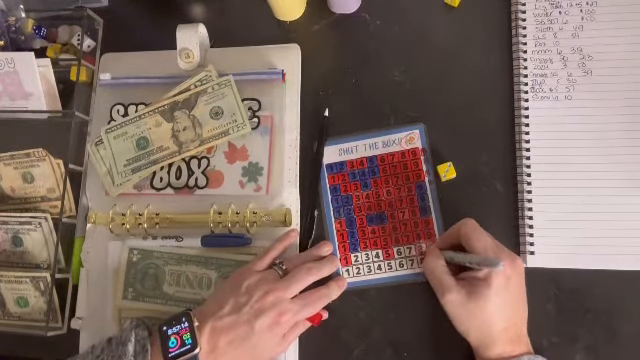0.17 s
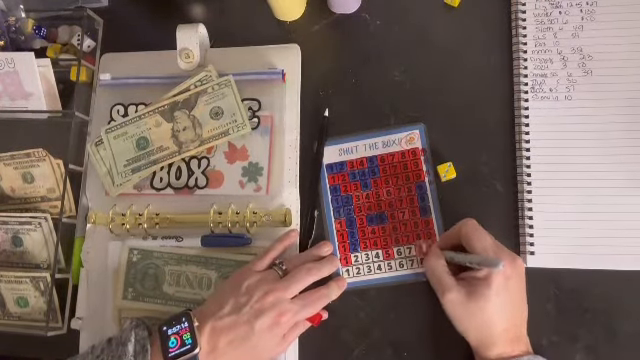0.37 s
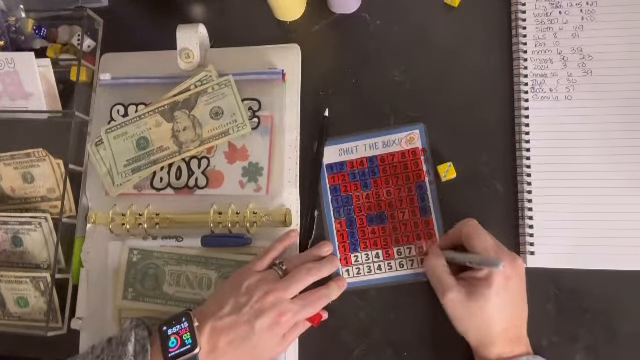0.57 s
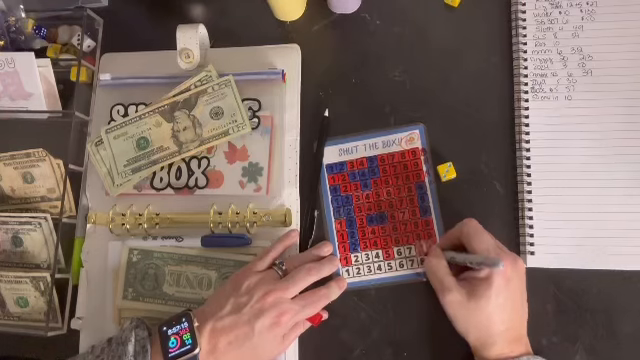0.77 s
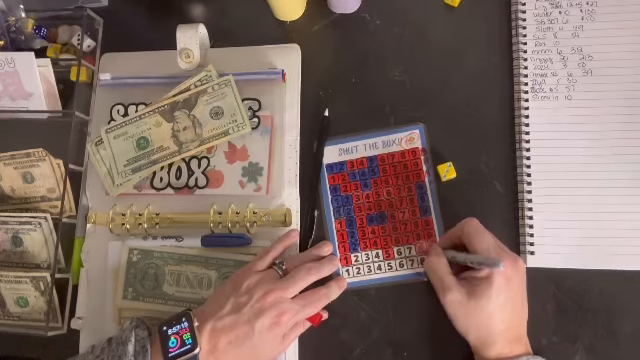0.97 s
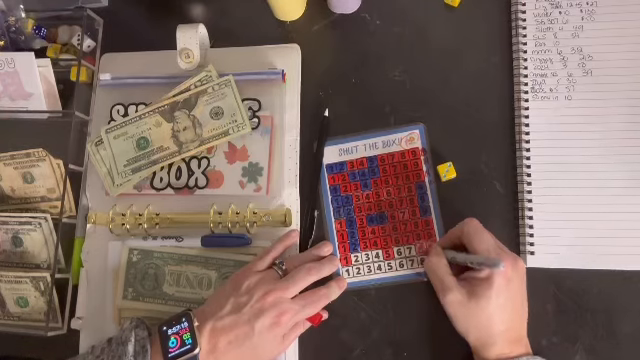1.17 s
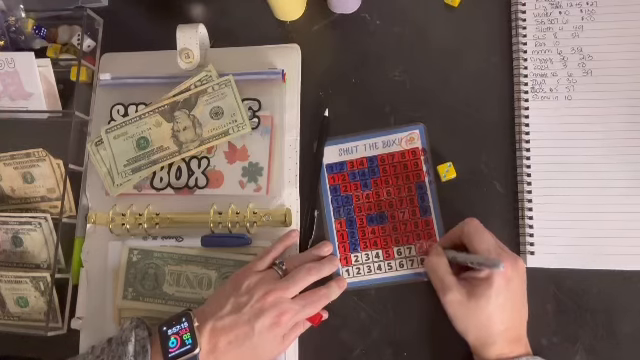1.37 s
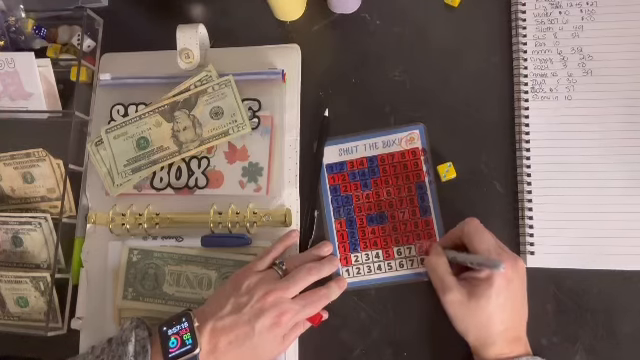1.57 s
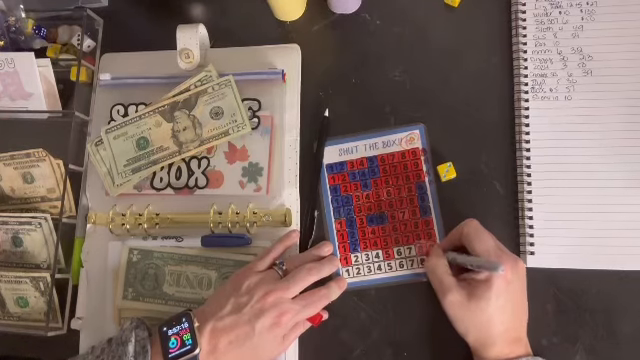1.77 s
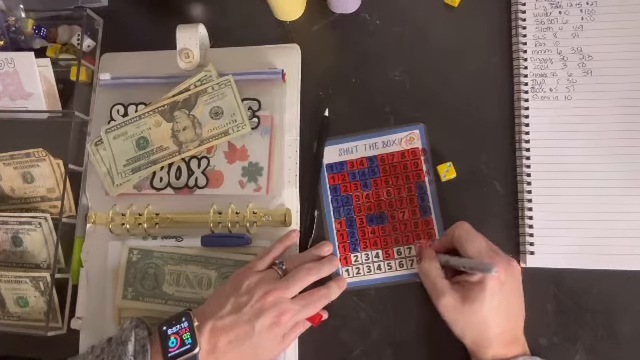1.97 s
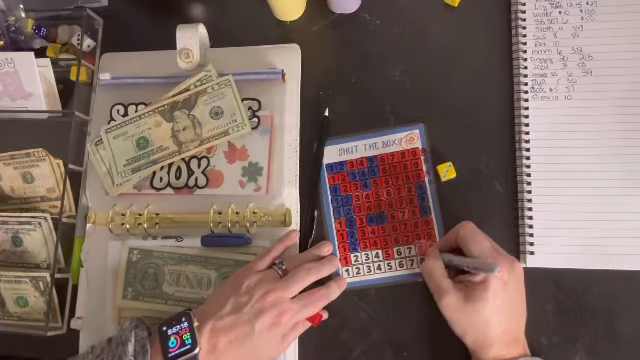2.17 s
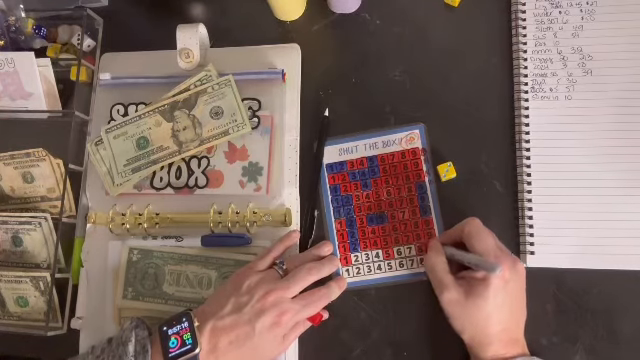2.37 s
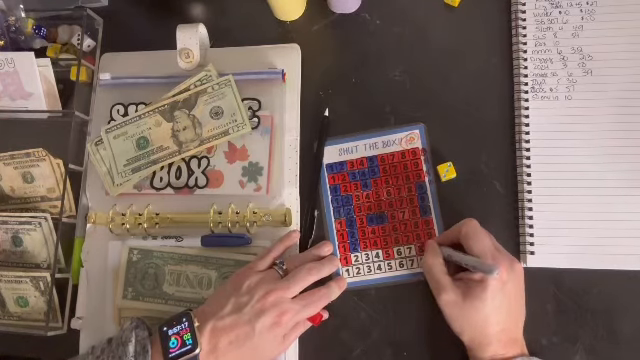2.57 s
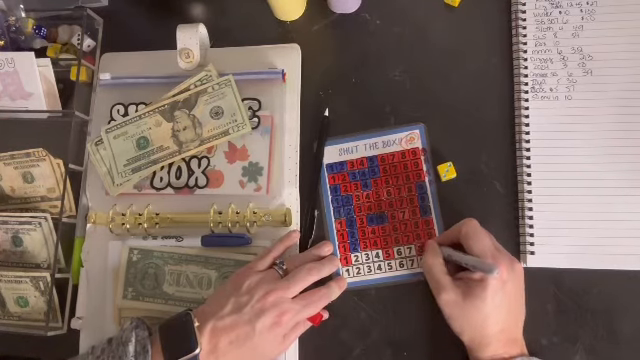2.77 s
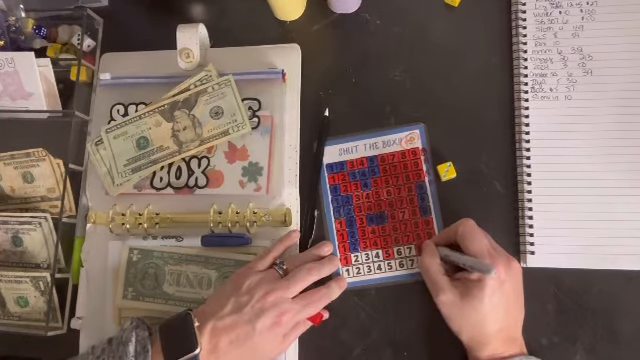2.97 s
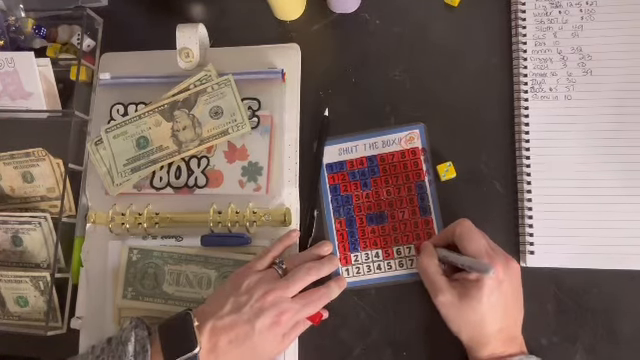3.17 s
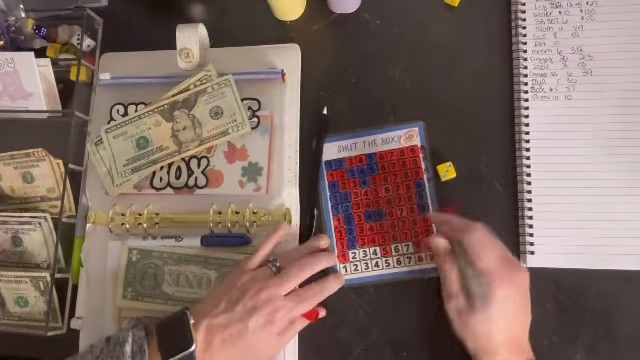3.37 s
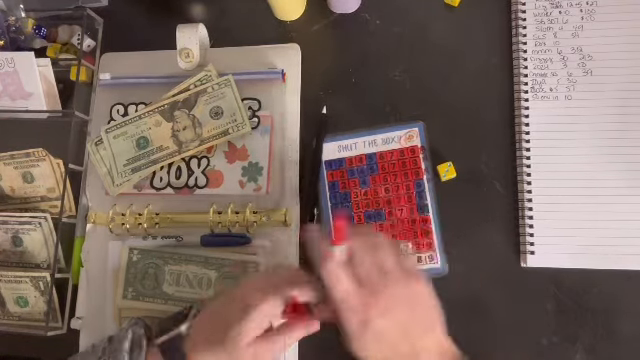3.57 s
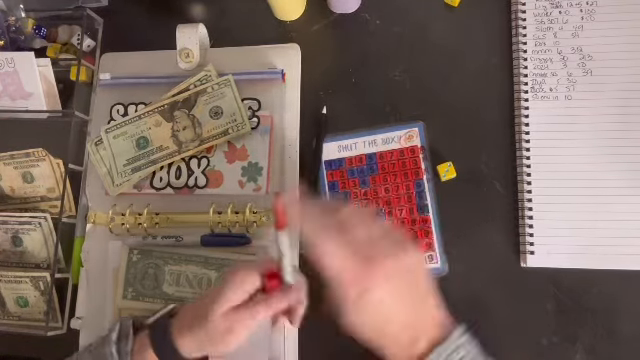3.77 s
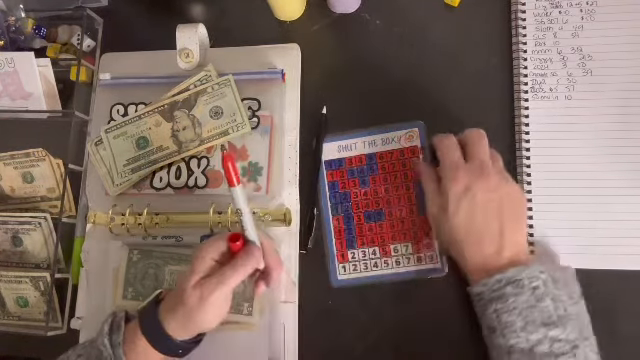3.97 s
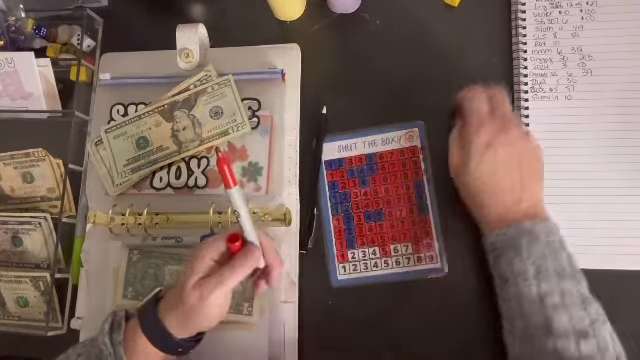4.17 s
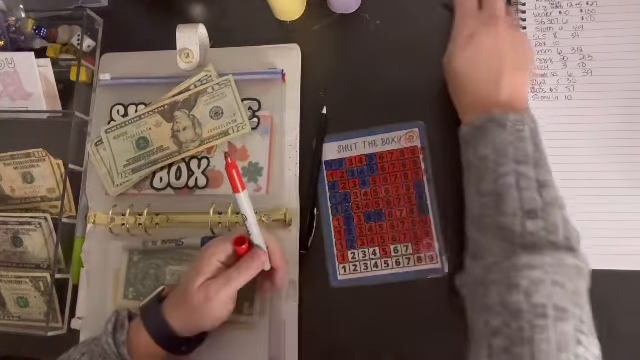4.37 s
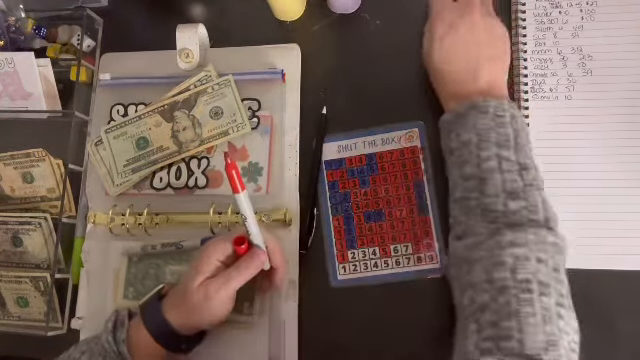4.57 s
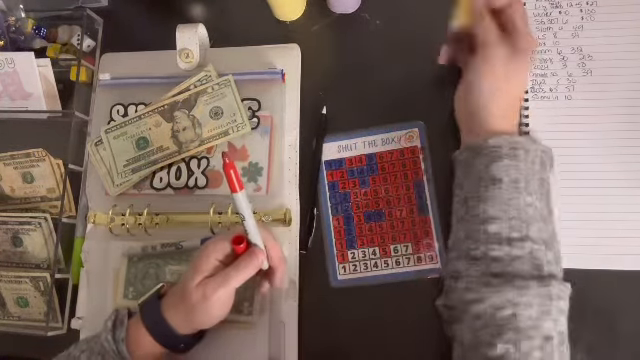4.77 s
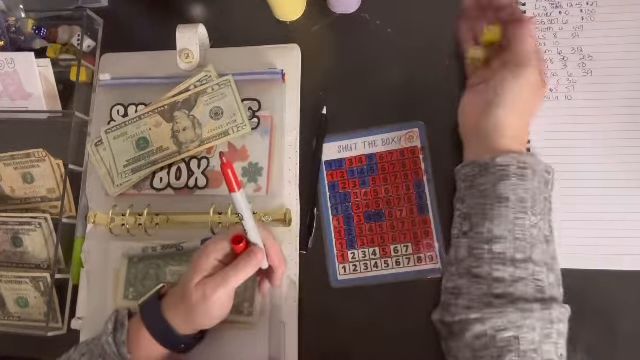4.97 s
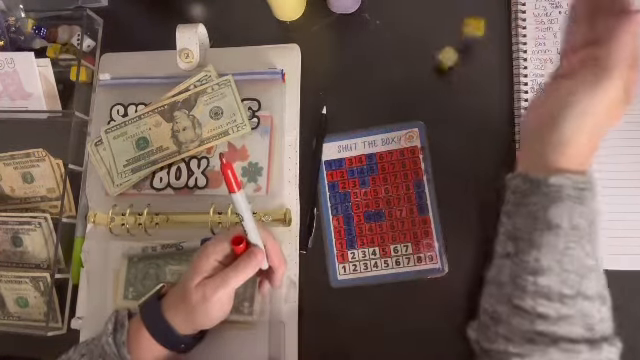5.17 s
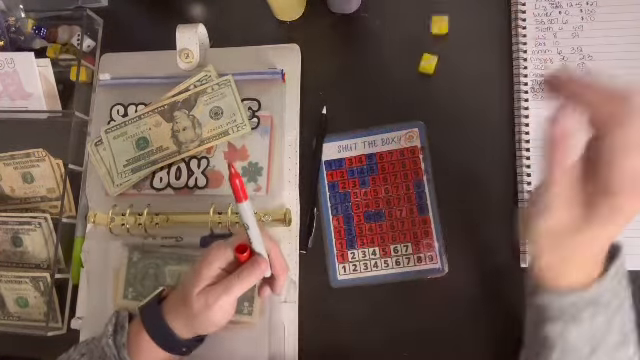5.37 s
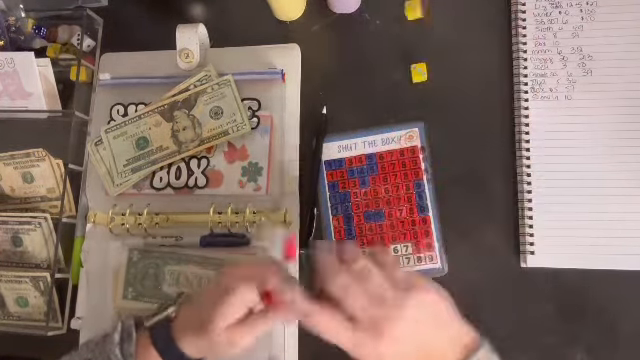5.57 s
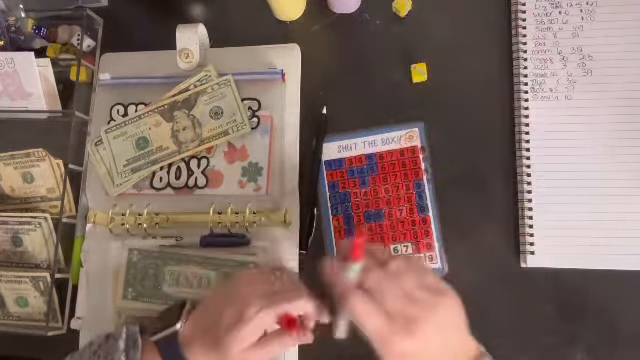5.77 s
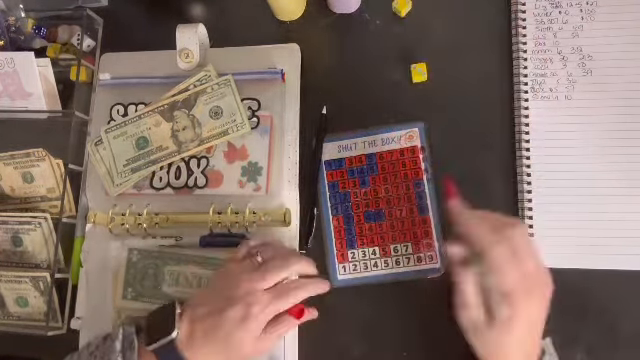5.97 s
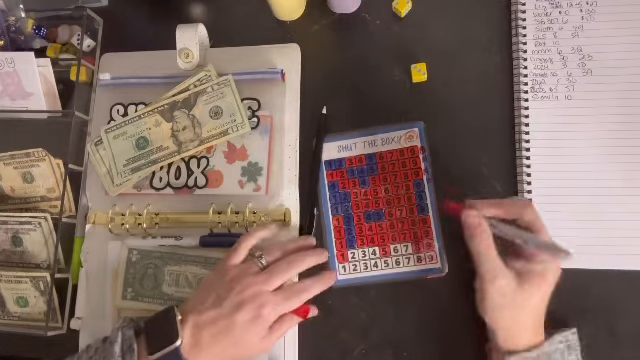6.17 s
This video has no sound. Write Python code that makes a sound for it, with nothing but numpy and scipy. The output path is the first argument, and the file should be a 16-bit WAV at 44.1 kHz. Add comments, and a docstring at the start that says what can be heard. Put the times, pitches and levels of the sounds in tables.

```python
"""A felt marker hisses back and forth on a card, colouring a square; its tip knocks now and then,
ringing card, barrel and the hard table below. A hand gathers two plastic dice, rattles and throws them:
they clack and tumble to rest, each bounce thumping the table top. A quiet small room rumbles underneath.
A phone above the table hears it through two close microphone ports."""
import sys
import numpy as np
from scipy import signal
from scipy.fft import rfft, irfft, next_fast_len
from scipy.io import wavfile
from scipy.ndimage import map_coordinates

SR = 44100
rng = np.random.default_rng(int(sys.argv[2]) if len(sys.argv) > 2 else 0)


def pcm_store(signal):
    """Save signal as 16-bit PCM."""
    levels = np.round(np.clip(np.atleast_2d(signal), -1, 1) * 32767)
    wavfile.write(sys.argv[1], SR, levels.astype(np.int16).T)


N = 273684
LEAD_S = .0016  # impacts start this early to allow for their lead-in

# Broad body of a die's clack: f/Hz, level/dB
CLACK_EQ = [(200, -6), (500, -3.5), (1200, -4), (2500, -0.5), (4500, -4.5), (6600, -14), (7500, -13.5),
            (10000, -28), (11200, -34.5), (15500, -54.5)]
# Resonances of a die on the table: f/Hz, width/Hz, level/dB
DIE_MODES = [(890, 70, 0), (1200, 80, -3), (1360, 110, 1), (1930, 110, 7), (2400, 100, -2), (2930, 130, -3),
             (3600, 150, -1), (4250, 220, 2), (4900, 150, -2), (5700, 350, -2), (6500, 250, -2),
             (9600, 500, 0)]
def die_clack(tilt_db):
    """Each corner weights the resonances differently; a harder one adds treble."""
    corner_db = rng.normal(0, 3.5, len(DIE_MODES))
    def colour(hz):
        peaks = sum(amp(db + luck) * resonance(hz, centre, width)
                    for (centre, width, db), luck in zip(DIE_MODES, corner_db))
        body = amp(along(CLACK_EQ, hz) + tilt_db * np.log2(1 + (hz / 3000) ** 2))
        return body * (1 + 1.3 * peaks)
    return impact(colour, t60=.015, rise_s=.00086, wet_db=-15.5, echo_db=-7.5)


# Dice hitting the table: t/s, level/dB, treble tilt/dB
BOUNCES = [(4.052, -47, -10.5), (4.1462, -49, -12.5), (4.4284, -28.5, 1.5), (4.52, -23, 5),
           (5.0735, -15.5, -2.5), (5.094, -12, -3), (5.1986, -13, 4.5), (5.2285, -20.5, -1),
           (5.235, -16, -0.5), (5.2429, -18.5, 0.5), (5.2686, -22, 1.5), (5.3022, -21.5, -0.5),
           (5.3099, -17, 4.5), (5.3563, -17, 4), (5.3633, -25.5, 1.5), (5.3841, -20, 2.5),
           (5.3921, -23.5, 1), (5.4044, -25.5, 4), (5.4208, -25, -3), (5.4307, -26, 3.5),
           (5.4703, -21.5, 1.5), (5.4764, -20.5, 2), (5.5131, -22.5, 0.5), (5.5306, -23.5, 2),
           (5.5657, -24, 3.5), (5.5828, -27, -1), (5.612, -28.5, 1.5), (5.6315, -24.5, 1.5),
           (5.657, -33, 2), (5.679, -23.5, 3.5), (5.7255, -29, 4), (5.7496, -32.5, -0.5)]
THROW_S, SCOOP_DB = 5, -8.5  # before the throw the dice are only scooped up and shake the table less
def dice_bounces():
    """A clack over a table thump; a flat, dull landing shakes the table more."""
    out = np.zeros((2, N))
    for s, db, tilt_db in BOUNCES:
        add(out, s - LEAD_S, amp(db) * die_clack(tilt_db))
        thump_db = db - 15 - 1.4 * max(tilt_db, -2) + SCOOP_DB * (s < THROW_S)
        add(out, s, amp(thump_db) * table_thump(soft_db=-2.5))
    return out


# Drags over the table: t/s, hold/s, level/dB
DRAGS = [(4.05, 0.09, -52), (4.19, 0.36, -72.5)]
# Tone of the scrape: f/Hz, level/dB
SCRAPE_EQ = [(600, -28), (1400, -10), (1900, 0), (2200, -4), (2600, -1), (3200, -9), (4100, -8),
             (4800, -14), (10000, -20), (11500, -38)]
# What a dragged die rings: f/Hz, width/Hz, level/dB
SCRAPE_MODES = [(1900, 380, 4), (4100, 300, 3)]
def dice_scrape():
    """The edge of a dragged die makes uneven, gritty contact."""
    def colour(hz):
        peaks = sum(amp(db) * resonance(hz, centre, width) for centre, width, db in SCRAPE_MODES)
        return amp(along(SCRAPE_EQ, hz)) * (1 + peaks)
    grit = amp(3.5 * wobble(220) + 2.5 * wobble(40))
    return gestures(DRAGS, attack_s=.0087, release_s=.04) * unit(grit * noise(colour))


# Plastic on plastic: t/s, level/dB, tilt/(dB per octave)
CLICKS = [(3.337, -85, 19), (3.3748, -59, 16), (3.4106, -52, -5.5), (3.666, -64.5, 16), (3.9759, -59, -6),
          (4.8866, -29, 3.5), (4.9843, -43.5, -4.5), (6.042, -79, 14), (6.1223, -58, -16.5)]
# Tone of the snap: f/Hz, level/dB
SNAP_EQ = [(500, -42.5), (1700, -10.5), (2600, -13.5), (3300, -4), (5300, 4), (8000, 2.5), (10500, -6.5),
           (12500, -27), (15500, -31.5)]
def plastic_clicks():
    """Marker, cap and dice meet in the hand: bright and dry, with a hollow plastic ring."""
    out = np.zeros((2, N))
    for s, db, tilt_db in CLICKS:
        def colour(hz):
            snap = amp(along(SNAP_EQ, hz) + tilt_db * np.log2(hz / 5000 + .046))
            return snap * (1 + resonance(hz, 3400, width_hz=500))
        click = impact(colour, t60=.0088, rise_s=.000094, wet_db=-20, echo_db=-18)
        add(out, s - LEAD_S, amp(db) * click)
    return out


# Tone of the tip's knock: f/Hz, level/dB
KNOCK_EQ = [(300, -17), (700, -7), (1500, 7.5), (2200, -5), (3200, -18), (5000, -24), (9000, -23),
            (15000, -57)]
CARD, BARREL = (790, 240), (1420, 130)  # resonances: f/Hz, width/Hz
def marker_knock(card_db, barrel_db):
    """A tap rings the card and the marker's barrel."""
    def colour(hz):
        card = amp(card_db) * resonance(hz, *CARD) ** 1.8
        barrel = amp(barrel_db) * resonance(hz, *BARREL) ** 1.04
        return amp(along(KNOCK_EQ, hz) - 16) + card - barrel
    return impact(colour, t60=.043, rise_s=.00019, wet_db=-13, echo_db=-11)


# Knocks that open each down-and-up pair of strokes: t/s, level/dB, barrel ring/dB
TURNS = [(0.028, -65, -5), (0.209, -73.5, -15), (0.404, -66, -22), (0.608, -68, 13), (0.794, -72.5, 16.5),
         (0.989, -78, 10), (1.188, -65.5, 7), (1.38, -74, 18), (1.587, -62.5, 2.5)]
# Single touch-up strokes: t/s, level/dB
DABS = [(1.85, -91), (2.0, -91), (2.227, -80), (2.66, -89), (2.76, -84), (2.85, -83), (3.01, -87)]
# Later knocks of the tip, last turns and set-downs: t/s, level/dB, ring/dB
LATER_KNOCKS = [(0.499, -74.5, -3), (1.804, -54.5, 14), (2.004, -70, -4), (2.137, -50, -1.5),
                (2.583, -72, 3), (2.679, -75, -1), (2.779, -54, -4.5), (2.863, -73, 5),
                (2.952, -55.5, -2.5), (3.027, -63, -1), (3.104, -55.5, -3.5), (3.799, -72, -5)]
# The marker knocked in the fingers, off the card: t/s, level/dB, barrel ring/dB
HANDLING = [(3.664, -63, -8), (6.181, -60.5, -6)]
# Hiss of felt on card: f/Hz, level/dB
FELT_EQ = [(1000, -8), (4000, -12.5), (5700, -6.5), (6700, 6.5), (7700, -10), (9000, 8), (10200, -0.5),
           (11500, -11.5), (13000, -23), (15500, -19)]
DOWN, UP = (.0028, -75), (.088, -72.5)  # strokes: delay after the turn/s, level before fading/dB
STROKE_S, FADE_DB_PER_S, SQUEAK_T60 = .083, 2.7, .16
THUMP_DUCK = .78  # knocks that ring more get less table thump, dB per dB
def marker():
    """Felt hisses down and up, fading as the square fills; the tip knocks where it turns or lands."""
    out, strokes = np.zeros((2, N)), np.zeros(N)
    sweep = np.sin(np.linspace(0, np.pi, round(STROKE_S * SR))) ** 1.2
    t = np.arange(len(sweep)) / SR
    pairs = [(s + delay, db - FADE_DB_PER_S * s) for s, *_ in TURNS for delay, db in (DOWN, UP)]
    for s, db in pairs + DABS:
        add(strokes, s, amp(db + rng.normal(0, 1)) * sweep)
    for s, db, barrel_db in TURNS:
        add(out, s - LEAD_S, amp(db) * marker_knock(card_db=3.5, barrel_db=barrel_db))
        # the down stroke rubs the barrel and keeps it ringing
        squeak = filtered(rng.standard_normal((2, len(t))), lambda hz: resonance(hz, *BARREL) ** 2)
        add(out, s, amp(db + barrel_db - 12 - 60 * t / SQUEAK_T60) * unit(squeak))
    for s, db, ring_db in LATER_KNOCKS:
        add(out, s - LEAD_S, amp(db) * marker_knock(card_db=ring_db, barrel_db=ring_db - 11))
        add(out, s, amp(db + 3.5 - THUMP_DUCK * ring_db) * table_thump(soft_db=14))
    for s, db, barrel_db in HANDLING:
        add(out, s - LEAD_S, amp(db) * marker_knock(card_db=-41, barrel_db=barrel_db))
    fibres = amp(2.1 * wobble(280))
    return out + strokes * unit(fibres * noise(eq(FELT_EQ)))


# The palm landing: t/s, level/dB
PALM_HITS = [(3.959, -48), (3.973, -35.5), (3.99, -48)]
# Arm moves: t/s, hold/s, level/dB
ARM_MOVES = [(3.35, 0.066, -69), (3.75, 0.24, -72.5), (6.09, 0.065, -70.5)]
# Rustle of skin and sleeve: f/Hz, level/dB
CLOTH_EQ = [(300, 11), (1500, -1.5), (2600, 2), (4800, -2.5), (8000, -1), (10500, -5), (12500, -16),
            (15500, -16)]
def hand():
    """The palm thuds on the table with a soft slap; skin and sleeve rustle as the arm moves."""
    out = np.zeros((2, N))
    skin = lambda hz: 1 / (1 + (hz / 500) ** 2)
    for s, db in PALM_HITS:
        slap = impact(skin, t60=.029, rise_s=.0011, wet_db=-13.5, echo_db=-5.5)
        add(out, s, amp(db) * table_thump(soft_db=4.5))
        add(out, s, amp(db - 8.5) * slap)
    folds = amp(3.1 * wobble(60))
    rustle = unit(folds * noise(eq(CLOTH_EQ)))
    return out + gestures(ARM_MOVES, attack_s=.018, release_s=.035) * rustle


# Low modes of the table top: f/Hz, level/dB, t60/s
TABLE_MODES = [(118.8, 3.5, 0.3), (144, -4.5, 0.094), (233.3, -6, 0.14), (374, 1.5, 0.2), (438.6, 0, 0.13)]
def table_thump(soft_db):
    """The table top booms, dead centre; a soft contact loses soft_db per octave."""
    t = np.arange(SR // 2) / SR
    ring = 0
    for hz, db, t60 in TABLE_MODES:
        struck_db = db - soft_db * np.log2(hz / 120) + rng.normal(0, 1)
        ring += amp(struck_db - 60 * t / t60) * np.sin(2 * np.pi * hz * t)
    return ring * (1 - np.exp(-t / .0013)) * [[1], [0]]


# Reverb time of the room: f/Hz, t60/s
ROOM_DECAY = [(200, 0.42), (560, 0.23), (1500, 0.36), (4000, 0.26), (10000, 0.21)]
def impact(colour, t60, rise_s, wet_db, echo_db):
    """A short crack, its first echo and a room tail that dies band by band; rms 1 over the first 5 ms."""
    lead, t = 64, np.arange(SR // 3) / SR
    crack = rng.standard_normal((2, len(t))) * amp(-60 * t / t60) * (1 - np.exp(-t / rise_s))
    echo = amp(echo_db) * np.roll(crack, round(.0082 * SR), axis=1)
    hz, frame_s, bands = signal.stft(rng.standard_normal((2, len(t))), SR, nperseg=256)
    walls = 1 / np.sqrt(1 + (hz[:, None] / 6000) ** 5)  # soft furnishings return little treble
    decay = amp(-60 * frame_s / along(ROOM_DECAY, hz)[:, None])
    tail = signal.istft(bands * walls * decay, SR, nperseg=256)[1][:, :len(t)]
    tail *= amp(wet_db) * (1 - np.exp(-t / .0018))
    hit = filtered(np.pad(crack + echo + tail, ((0, 0), (lead, 0))), colour)
    # fade in the filter's pre-ring so the hit starts without a click
    hit[:, :lead] *= np.hanning(2 * lead)[:lead]
    return hit / np.sqrt(np.mean(hit[:, :SR // 200] ** 2, axis=1, keepdims=True))


# Fader ride of the room's rumble in the table top: t/s, level/dB
RUMBLE_RIDE = [(0, -67.5), (1.5, -73), (2.3, -70), (2.6, -67.5), (3.3, -67), (3.6, -68), (4.5, -67),
               (6.21, -70)]
# Tone of the rumble: f/Hz, level/dB
RUMBLE_EQ = [(13, -54), (22, -17.5), (35, -17), (54, 2), (86, -2), (114, 5.5), (132, 2), (146, -9.5),
             (291, -24.5), (330, -15.5), (430, -50.5), (730, -120)]
# Tone of the air: f/Hz, level/dB
AIR_EQ = [(150, -2), (400, -5.5), (800, -11.5), (1400, -12.5), (2500, -17), (5000, -25), (9000, -27),
          (15500, -36.5)]
def room_tone():
    """A wavering low rumble under a thin, slowly drifting hiss."""
    ride = amp(np.interp(np.arange(N) / SR, *np.transpose(RUMBLE_RIDE)))
    rumble = ride * amp(1.8 * wobble(5.5)) * noise(eq(RUMBLE_EQ))
    hiss = amp(-75.5 + 2 * wobble(1.2)) * noise(eq(AIR_EQ))
    return rumble + hiss


def amp(db):
    """Decibels to gain."""
    return 10 ** (np.asarray(db) / 20)


def unit(x):
    """Scaled to rms 1."""
    return x / np.sqrt(np.mean(x ** 2) + 1e-20)


def along(points, hz):
    """Read (f/Hz, value) points on a log axis."""
    f, v = np.transpose(points)
    return np.interp(np.log(hz + 1), np.log(f + 1), v)


def eq(points):
    """A response through (f/Hz, level/dB) points."""
    return lambda hz: amp(along(points, hz))


def resonance(hz, centre_hz, width_hz):
    """A causal resonance of peak gain 1."""
    return 1j * hz * width_hz / (centre_hz ** 2 - hz ** 2 + 1j * hz * width_hz)


def filtered(x, response):
    """x through a complex frequency response."""
    size = next_fast_len(x.shape[-1] + 4096)
    return irfft(rfft(x, size) * response(np.fft.rfftfreq(size, 1 / SR)), size)[..., :x.shape[-1]]


def noise(colour):
    """Two unrelated coloured noises of rms 1."""
    return unit(filtered(rng.standard_normal((2, N)), colour))


def wobble(rate):
    """A smooth random curve, rate knots a second."""
    return map_coordinates(rng.standard_normal(int(N * rate / SR) + 4), [np.arange(N) * rate / SR])


def gestures(rows, attack_s, release_s):
    """An envelope: each row swells and dies by 20 dB in the given times around its hold."""
    t = np.arange(N) / SR
    return sum(amp(db - 20 * np.maximum(s - t, 0) / attack_s
                   - 20 * np.maximum(t - s - hold, 0) / release_s) for s, hold, db in rows)


def add(track, s, sound):
    """Mix a sound in at time s."""
    part = track[..., round(s * SR):][..., :sound.shape[-1]]
    part += sound[..., :part.shape[-1]]


def stereo(pair, likeness):
    """Two unrelated signals, as mid and side, become left and right of a given likeness."""
    angle = lambda hz: np.arccos(np.clip(along(likeness, hz), -1, 1)) / 2
    mid, side = filtered(pair, lambda hz: np.array([np.cos(angle(hz)), np.sin(angle(hz))]))
    return np.array([mid + side, mid - side])


# Stereo image of things on the table: f/Hz, left-right likeness
NEAR_IMAGE = [(100, .99), (600, .92), (1400, .8), (2600, .55), (4500, .8), (6700, .95), (7800, .995),
              (10000, .93), (15000, .9)]
# Stereo image of the room tone: f/Hz, left-right likeness
ROOM_IMAGE = [(100, 1), (300, 0.28), (700, 0.076), (2500, 0.041), (5000, 0.44), (8000, 1), (15000, .4)]
def scene():
    """Everything near the table, over the room; the near sounds carry no deep bass."""
    near = dice_bounces() + dice_scrape() + plastic_clicks() + marker() + hand()
    near = filtered(near, lambda hz: (1j * hz / (90 + 1j * hz)) ** 3)
    return stereo(near, NEAR_IMAGE) + stereo(room_tone(), ROOM_IMAGE)


# Phase of the left port behind the right: f/Hz, lag/rad
PORT_LAG = [(0, 0), (3600, .5), (5700, 1.5), (7750, 3.14), (9800, 4.8), (11200, 6.2), (12600, 6.4),
            (14000, 9.3), (16000, 9.4)]
TOP_HZ = 15400
def record(dry):
    """The left port lags more toward the treble and is a little quieter in the low mids; the top is cut."""
    def ports(hz):
        lag = np.interp(hz, *np.transpose(PORT_LAG))
        lean_db = along([(60, -.3), (600, -.9), (2500, -.05)], hz)
        left = amp(lean_db) * np.exp(-.5j * lag)
        right = amp(-lean_db) * np.exp(.5j * lag)
        return np.array([left, right]) * (hz < TOP_HZ)
    return filtered(dry, ports)


dry = scene()
out = record(dry)
pcm_store(out)
```